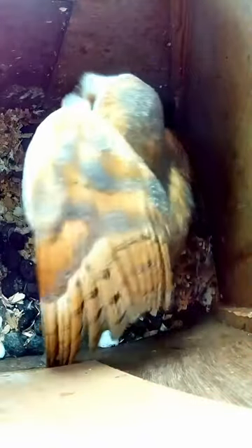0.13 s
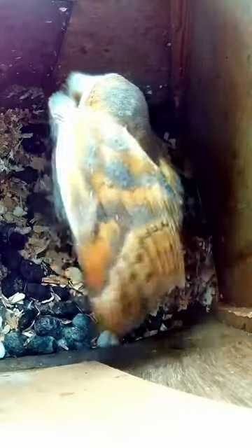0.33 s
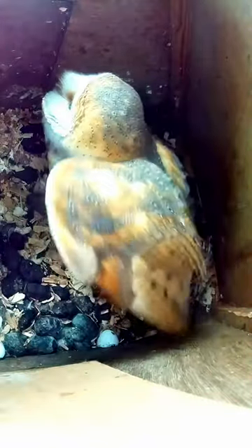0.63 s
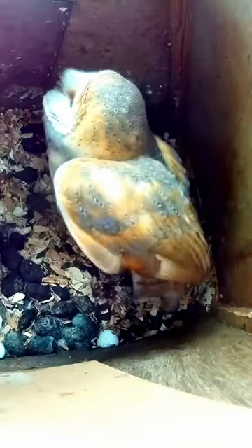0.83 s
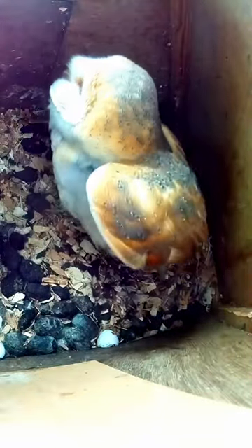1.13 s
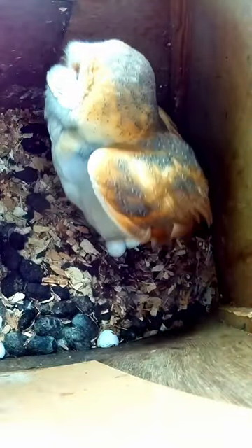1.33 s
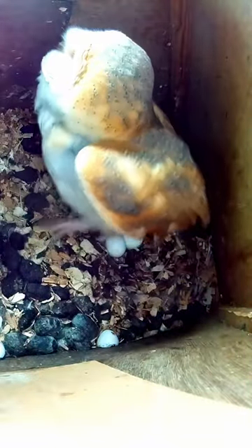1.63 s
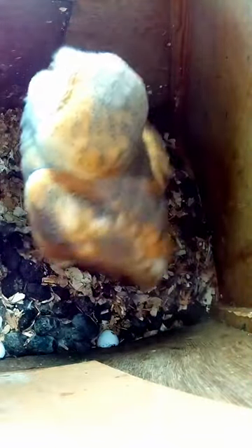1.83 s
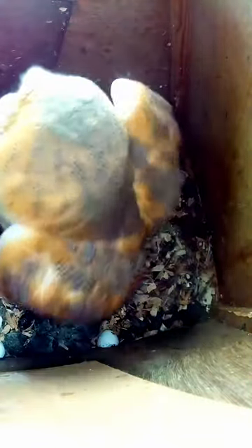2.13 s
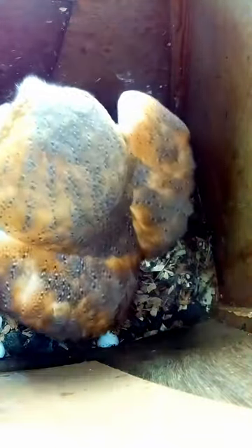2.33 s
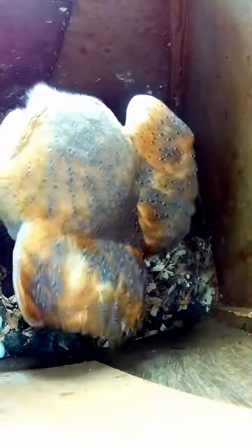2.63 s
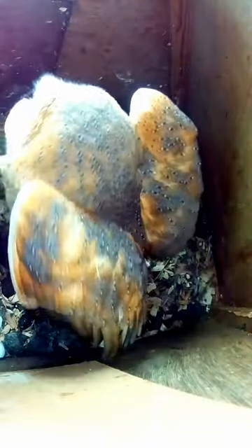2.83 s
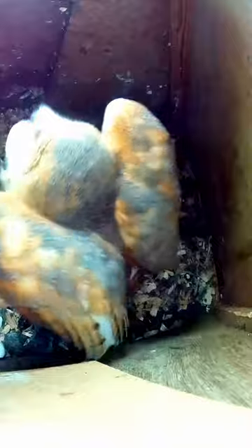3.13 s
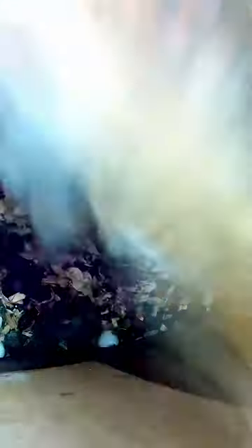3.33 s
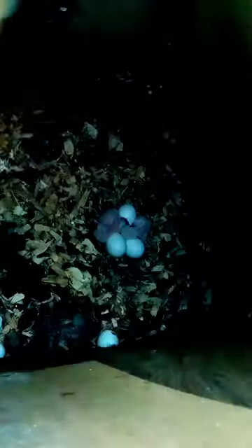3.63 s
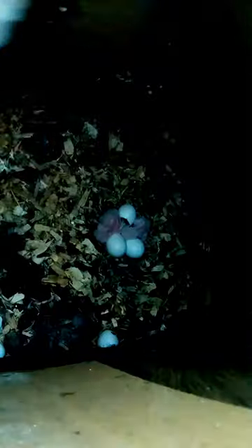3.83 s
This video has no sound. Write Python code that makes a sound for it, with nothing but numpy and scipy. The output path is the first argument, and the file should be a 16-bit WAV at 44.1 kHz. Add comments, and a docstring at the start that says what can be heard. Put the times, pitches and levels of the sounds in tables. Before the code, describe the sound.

Wooden knocks, claw clicks and wing thumps burst out as an owl scrambles inside its box

```python
"""Claw ticks, knocks, feather brushing and low thumps: an owl shifts on the litter of a wooden
nest box, then beats its wings and scrambles. Low rumble and faint distant whistles lie behind.
Boards are dying sine modes with noise thuds; claws are noise bursts; feathers are impulses and
noise under stroke envelopes; juddering quills are an uneven two-harmonic tone; draughts and
rumble are coloured noise; the songbird is gliding sines with a noise echo."""
import sys
import numpy as np
from scipy import signal
from scipy.fft import rfft, irfft
from scipy.io import wavfile
from scipy.ndimage import uniform_filter1d

SR = 44100
rng = np.random.default_rng(int(sys.argv[2]) if len(sys.argv) > 2 else 0)


def transcribe(u):
    """Save the signal u as a 16-bit wav file named by the first command-line argument.

    u: samples, shape (n,) or (channels, n), limited to [-1, 1]; the rate is SR.
    q: integer samples, one column per channel.
    """
    v = np.clip(np.atleast_2d(u).T, -1, 1)
    q = np.round(v * 32767).astype(np.int16)
    wavfile.write(sys.argv[1], SR, q)


N = 176400
T = np.arange(N) / SR

# Blows of feet and wings. Each row: start in seconds, wall pitch in Hz, wall ring in dB, board ring in dB.
KNOCKS = [(2.721, 853, -35, -50), (2.829, 982, -14, -25.5), (2.835, 1381, -20, -32),
          (2.908, 1100, -25, -23), (2.929, 1005, -13, -26.5), (2.971, 987, -23.5, -16.5),
          (2.979, 1013, -30, -21), (3.016, 1023, -41, -33), (3.286, 1069, -18.5, -23.5),
          (3.316, 1000, -29.5, -32.5), (3.387, 980, -35.5, -30), (3.46, 955, -20, -32.5),
          (3.57, 972, -33.5, -41), (3.752, 1468, -35.5, -48), (3.761, 940, -33.5, -33)]
# Bumps of feet on the littered floorboard. Each row: start in seconds, board ring in dB.
BUMPS = [(.064, -51.5), (.322, -55), (.695, -51), (.772, -55), (.846, -51.5), (1.085, -59), (3.108, -37.5),
         (3.703, -34.5), (3.777, -31)]
# Wall modes. Each row: ratio to the wall pitch, level in dB, t60 in seconds.
WALL_MODES = [(0.984, -1, 0.028), (1.5, -22, 0.03), (.84, -18.5, 0.069), (1.3, -20, 0.042)]
# Floorboard modes. Each row: frequency in Hz, level in dB, t60 in seconds.
BOARD_MODES = [(266.3, -14, 0.12), (434.7, -10, 0.091), (500, -8.5, 0.061), (556, -7, 0.037)]
# Dull noise of the boards. Each row: frequency in Hz, gain in dB.
THUD_COLOUR = [(150, -21), (300, 0.5), (1150, -2.5), (2500, -19), (9000, -31.5)]
WALL_RISE_S, BOARD_RISE_S = 0.0031, 0.003
DETUNE_MIN, DETUNE_MAX = -0.01512, 0.024  # per mode and blow, fraction of its frequency
THUD_DB, THUD_DECAY_S = -12.5, 0.0087  # dB re the louder of wall and board
BUMP_THUD_DB = 3.5  # extra thud of a bump

# Claw ticks and snapping litter. Each row: start in seconds, level in dB.
TICKS = [(0.844, -52), (0.909, -55), (1.081, -55.5), (1.11, -60), (2.683, -48), (2.755, -39),
         (2.835, -21.5), (2.910, -24.5), (2.927, -10.5), (2.942, -29.5), (2.969, -25.5), (3.283, -40.5),
         (3.457, -37), (3.472, -36.5), (3.572, -33)]
# Spectrum of ticks and snaps. Each row: frequency in Hz, gain in dB.
TICK_COLOUR = [(400, -12), (1300, 4.5), (3000, 1.5), (5700, 4), (7000, 0), (11000, -9), (16000, -12.5)]
# Claw slips on wood. Each row: peak in seconds, rise in seconds, fall in seconds, level in dB.
SCRAPES = [(3.591, .008, .008, -54.5), (3.619, 0.013, 0.0054, -41.5)]
# Spectrum of a slip. Each row: frequency in Hz, gain in dB.
SCRAPE_COLOUR = [(2700, -14.5), (3500, 0), (4700, -5), (6200, -7.5), (16000, -20)]
TICK_RISE_S, TICK_DECAY_S, CATCHES_PER_S = 0.0019, 0.003, 1800

# Wing and body strokes. Each row: peak in seconds, rise in seconds, fall in seconds,
# feather rustle in dB, hollow rush in dB.
STROKES = [(0.805, 0.019, 0.035, -63, -62), (1.102, 0.02, 0.06, -63, -59.5),
           (2.662, 0.025, 0.047, -57, -48.5), (2.751, 0.028, 0.017, -43.5, -38),
           (2.836, 0.035, 0.024, -36.5, -32.5), (2.91, 0.034, 0.081, -67, -37.5),
           (3.014, 0.0063, 0.083, -53.5, -46.5), (3.194, 0.077, 0.038, -45.5, -46.5),
           (3.5, 0.23, 0.19, -70, -46.5), (3.79, 0.071, 0.051, -66, -41), (3.9, 0.07, 0.083, -65, -48.5)]
# Spectrum of the rustle. Each row: frequency in Hz, gain in dB.
FEATHER_COLOUR = [(200, 20), (1000, -13), (1800, -4), (3900, 4), (5500, -3), (12000, 6.5), (16000, -12.5)]
BARBS_PER_S, BARB_SPREAD_DB, BARB_SHARE = 2700, 3.5, 0.61
SNAPS_PER_S, SNAP_DECAY_S, SNAP_DB = 40, 0.003, 2  # dB re the stroke's rustle level
CLUMP_RMS_DB = 1.7

# Wing quills juddering along a wall. Each row: time in seconds, level in dB.
JUDDER_LEVEL = [(2.79, -82), (2.82, -28), (2.875, -31.5), (2.905, -21), (2.93, -28.5), (2.95, -86)]
JUDDER_HZ, JUDDER_JITTER, JUDDER_GRIT = 160.75, 0.0273, 0.28  # jitter: rms fraction of the pitch
JUDDER_WAVER_DB = 2

# Low thumps of the box under a step or wingbeat. Each row: start in seconds, pitch in Hz, level in dB.
THUMPS = [(1.105, 194, -42), (1.113, 62.8, -16.5), (1.178, 58.3, -23), (2.722, 33, -17.5),
          (2.75, 65.2, -16), (2.849, 64.6, -18), (3.777, 290.7, -28), (3.783, 168, -26)]
THUMP_RISE_S, THUMP_DECAY_S = 0.0048, 0.0259

# Spectrum of the rush in the hollow box. Each row: frequency in Hz, gain in dB.
HOLLOW_COLOUR = [(100, -5), (160, 6), (215, -7.5), (280, 4), (360, -4), (445, -6), (720, -12), (950, -11.5),
                 (2000, -26.5), (8000, -36.5)]
# Spectrum of draughts buffeting the microphone. Each row: frequency in Hz, gain in dB.
BUFFET_COLOUR = [(12, -13.5), (46, -0.5), (300, -59)]
# Strength of the buffeting. Each row: time in seconds, level in dB.
GUSTS = [(2.55, -46.5), (2.71, -45.5), (2.74, -27), (2.99, -27.5), (3.2, -40), (4, -37)]
HOLLOW_WAVER_DB = 2

# Spectrum of the box's reflections. Each row: frequency in Hz, gain in dB.
BOX_COLOUR = [(200, -3), (280, 14), (360, -10), (480, 5.5), (720, 5.5), (960, 2.5), (1300, -5), (3000, 1),
              (14000, -17)]
BOX_T60_S, BOX_DB, BOX_DELAY_S = 0.13, -17.5206, 0.003

# Distant whistles. Each row: start in seconds, length in seconds, first pitch in Hz,
# last pitch in Hz, level in dB.
WHISTLES = [(0.62, 0.1, 2100, 2690, -72), (.72, .12, 2690, 2190, -71.5), (.71, 0.19, 1880, 1810, -74.5),
            (1.33, 0.148, 2310, 2180, -71.5), (1.48, 0.127, 2166, 2250, -75.5),
            (1.77, 0.07, 1840, 1745, -70), (2.338, .21, 2310, 2253, -67), (3.79, .08, 8550, 7700, -62)]
ECHO_DB, ECHO_T60_S = -7.5, 0.45

# Spectrum of the steady background. Each row: frequency in Hz, gain in dB.
FLOOR_COLOUR = [(25, -27.5), (40, -1), (62, -1), (115, -28), (230, -35), (280, -32.5), (400, -42),
                (530, -36), (640, -42.5), (1400, -44), (3000, -53.5), (16000, -57.5)]
# Wavering band of far outdoor noise. Each row: frequency in Hz, gain in dB.
FAR_COLOUR = [(700, -12), (1130, 1), (1350, -2), (2400, -47.5)]
FLOOR_DB, FAR_DB, FAR_WAVER_DB = -44, -76.5, 3
EDGE_HZ = 16050


def amp(db):
    """Linear gain of a level in dB."""
    return 10 ** (np.asarray(db) / 20)


def unit(x):
    """Scales x to an rms of 1."""
    return x / np.sqrt(np.mean(x ** 2) + 1e-20)


def add(mix, start_s, sound):
    """Adds sound into mix in place, cut at the end of mix."""
    part = mix[round(start_s * SR):][:len(sound)]
    part += sound[:len(part)]


def colour(x, points):
    """Filters x by gains interpolated over log frequency, to an rms of 1."""
    hz, db = np.transpose(points)
    bins_hz = np.fft.rfftfreq(len(x), 1 / SR)
    gain = amp(np.interp(np.log(bins_hz + 1), np.log(hz), db))
    return unit(irfft(rfft(x) * gain, len(x)))


def noise(points):
    """Coloured noise over the full length, rms 1."""
    return colour(rng.standard_normal(N), points)


def level(rows):
    """Gain along a curve in dB, silent before its first point."""
    times_s, db = np.transpose(rows)
    return amp(np.interp(T, times_s, db, left=-np.inf))


def drift(size):
    """Slow random curve of rms 1, smoothed twice over size samples."""
    once = uniform_filter1d(rng.standard_normal(N), size)
    return unit(uniform_filter1d(once, size))


def impulses(per_s):
    """Random impulses of either sign at a mean rate."""
    return (rng.random(N) < per_s / SR) * rng.choice([-1, 1], N)


def swell(peak_s, rise_s, fall_s):
    """Bell-shaped envelope with unequal sides."""
    return np.exp(-((T - peak_s) / np.where(T < peak_s, rise_s, fall_s)) ** 2)


def ring(modes, rise_s):
    """Detuned modes that build up over the contact time, then die away."""
    t = np.arange(SR // 4) / SR
    total = np.zeros(len(t))
    for hz, db, t60_s in modes:
        struck_hz = hz * (1 + rng.uniform(DETUNE_MIN, DETUNE_MAX))
        decay = np.exp(-np.log(1000) * np.maximum(t - rise_s, 0) / t60_s)
        total += amp(db) * decay * np.sin(2 * np.pi * (struck_hz * t + rng.random()))
    return np.minimum(t / rise_s, 1) * total


def strike_board(out, start_s, board_db, thud_db):
    """Adds a floorboard ring and a short dull noise thud."""
    t = np.arange(SR // 4) / SR
    add(out, start_s, amp(board_db) * ring(BOARD_MODES, BOARD_RISE_S))
    envelope = np.minimum(t / BOARD_RISE_S, 1) * np.exp(-t / THUD_DECAY_S)
    thud = colour(rng.standard_normal(len(t)), THUD_COLOUR) * envelope
    add(out, start_s, amp(thud_db) * thud)


def knocks():
    """A blow rings a wall and the floorboard over a thud; a bump stirs only the floor."""
    out = np.zeros(N)
    for start_s, hz, wall_db, board_db in KNOCKS:
        modes = [(hz * ratio, db, t60_s) for ratio, db, t60_s in WALL_MODES]
        add(out, start_s, amp(wall_db) * ring(modes, WALL_RISE_S))
        strike_board(out, start_s, board_db, max(wall_db, board_db) + THUD_DB)
    for start_s, db in BUMPS:
        strike_board(out, start_s, db, db + BUMP_THUD_DB + THUD_DB)
    return out


def claws():
    """Ticks are short bright noise bursts; slips are random tiny catches under a swell."""
    out, t = np.zeros(N), np.arange(4096) / SR
    envelope = np.minimum(t / TICK_RISE_S, 1) * np.exp(-t / TICK_DECAY_S)
    for start_s, db in TICKS:
        tick = colour(rng.standard_normal(len(t)), TICK_COLOUR) * envelope
        add(out, start_s, amp(db) * tick)
    slips = sum(amp(db) * swell(peak_s, rise_s, fall_s) for peak_s, rise_s, fall_s, db in SCRAPES)
    return out + colour(impulses(CATCHES_PER_S), SCRAPE_COLOUR) * slips


def judder():
    """Quills stick and slip on the wood: an uneven, gritty groan."""
    hz = JUDDER_HZ * (1 + JUDDER_JITTER * drift(size=300))
    phase = 2 * np.pi * np.cumsum(hz) / SR
    groan = np.sin(phase) + 0.79 * np.sin(2 * phase)
    groan *= amp(JUDDER_WAVER_DB * drift(size=200))
    grit = JUDDER_GRIT * noise(THUD_COLOUR) * (1 + 0.5 * np.sin(phase))
    return (groan + grit) * level(JUDDER_LEVEL)


def feathers():
    """Barbs flick past each other in clumps under each stroke, with stray snaps of litter."""
    barb_db = BARB_SPREAD_DB * np.minimum(rng.exponential(1, N), 4)
    barbs = unit(impulses(BARBS_PER_S) * amp(barb_db))
    brush = BARB_SHARE * barbs + (1 - BARB_SHARE) * rng.standard_normal(N)
    clumps = amp(CLUMP_RMS_DB * drift(size=200))
    rustle = colour(brush, FEATHER_COLOUR) * clumps
    snap_starts = 1. * (rng.random(N) < SNAPS_PER_S / SR)
    snap_envelope = signal.lfilter([1], [1, -np.exp(-1 / (SNAP_DECAY_S * SR))], snap_starts)
    snaps = noise(TICK_COLOUR) * snap_envelope
    effort = sum(amp(db) * swell(peak_s, rise_s, fall_s) for peak_s, rise_s, fall_s, db, _ in STROKES)
    return effort * (rustle + amp(SNAP_DB) * snaps)


def thumps():
    """The box sways briefly after a step or wingbeat: a fast-dying sine each."""
    out, t = np.zeros(N), np.arange(SR // 2) / SR
    envelope = (1 - np.exp(-t / THUMP_RISE_S)) * np.exp(-t / THUMP_DECAY_S)
    for start_s, hz, db in THUMPS:
        add(out, start_s, amp(db) * np.sin(2 * np.pi * hz * t) * envelope)
    return out


def air():
    """Wing draughts rush in the hollow box and buffet the microphone."""
    draught = sum(amp(db) * swell(peak_s, rise_s, fall_s) for peak_s, rise_s, fall_s, _, db in STROKES)
    rush = noise(HOLLOW_COLOUR) * draught * amp(HOLLOW_WAVER_DB * drift(size=400))
    return rush + noise(BUFFET_COLOUR) * level(GUSTS)


def box(x):
    """Adds dense, quickly dying reflections between the boards."""
    t = np.arange(SR // 3) / SR
    decay = np.exp(-np.log(1000) * t / BOX_T60_S) * (t > BOX_DELAY_S)
    tail = colour(rng.standard_normal(len(t)), BOX_COLOUR) * decay
    return x + amp(BOX_DB) * signal.fftconvolve(x, tail / np.linalg.norm(tail))[:N]


def songbird():
    """Gliding pure notes, drawn out by a dying noise echo."""
    out, t = np.zeros(N), np.arange(SR // 2) / SR
    for start_s, length_s, first_hz, last_hz, db in WHISTLES:
        progress = np.linspace(0, 1, round(length_s * SR))
        hz = first_hz + (last_hz - first_hz) * progress
        envelope = np.sqrt(abs(np.sin(np.pi * progress)))
        add(out, start_s, amp(db) * envelope * np.sin(2 * np.pi * np.cumsum(hz) / SR))
    echo = rng.standard_normal(len(t)) * np.exp(-np.log(1000) * t / ECHO_T60_S)
    return out + amp(ECHO_DB) * signal.fftconvolve(out, echo / np.linalg.norm(echo))[:N]


def background():
    """Steady low rumble and hiss, with a slowly wavering band of far outdoor noise."""
    far_gain = amp(FAR_DB + FAR_WAVER_DB * drift(size=5000))
    return amp(FLOOR_DB) * noise(FLOOR_COLOUR) + far_gain * noise(FAR_COLOUR)


def scene():
    """The owl in its box over the background; only knocks and claws get reflections."""
    owl = box(knocks() + claws()) + judder() + feathers() + thumps() + air()
    return (owl + songbird() + background())[None]


def record(dry):
    """Band limit: a steep linear-phase low-pass."""
    lowpass = signal.firwin(511, EDGE_HZ, window=("kaiser", 9), fs=SR)
    return signal.oaconvolve(dry, lowpass[None], "same")


dry = scene()
out = record(dry)
transcribe(out)
```